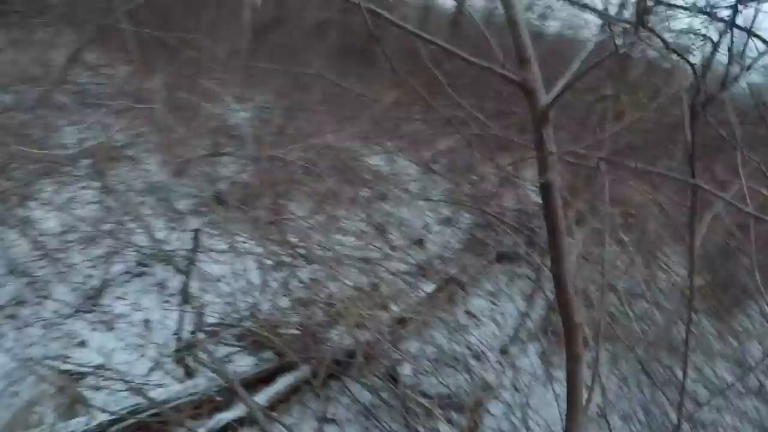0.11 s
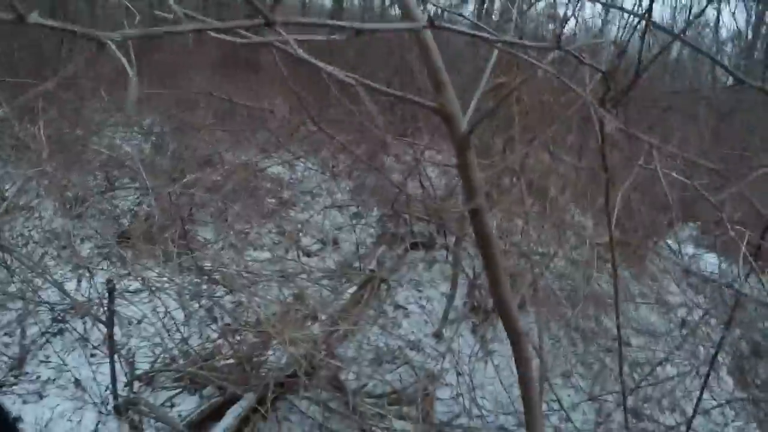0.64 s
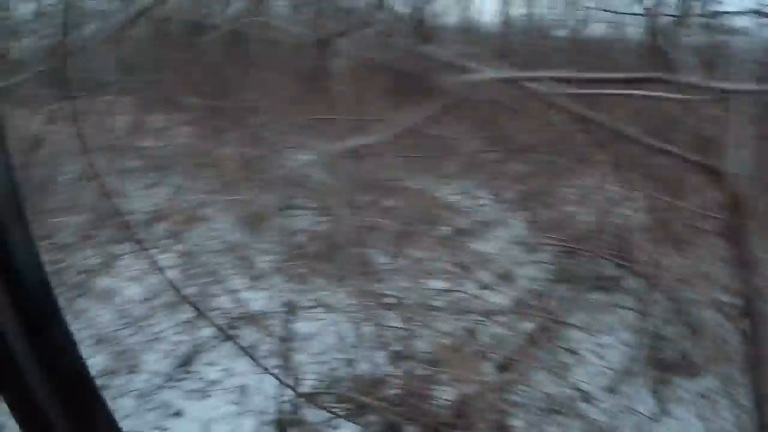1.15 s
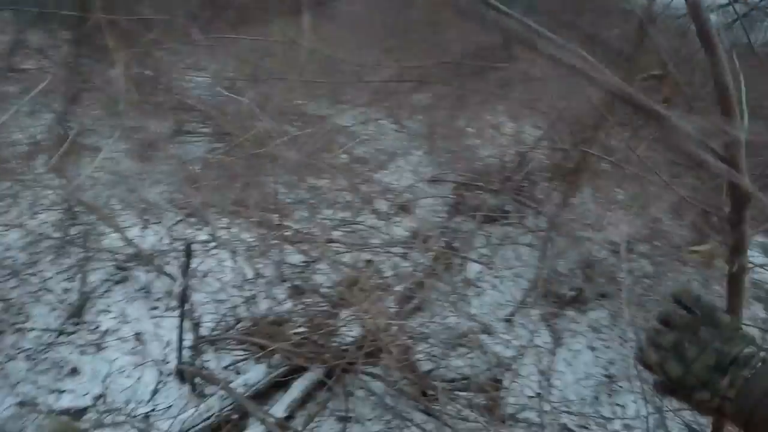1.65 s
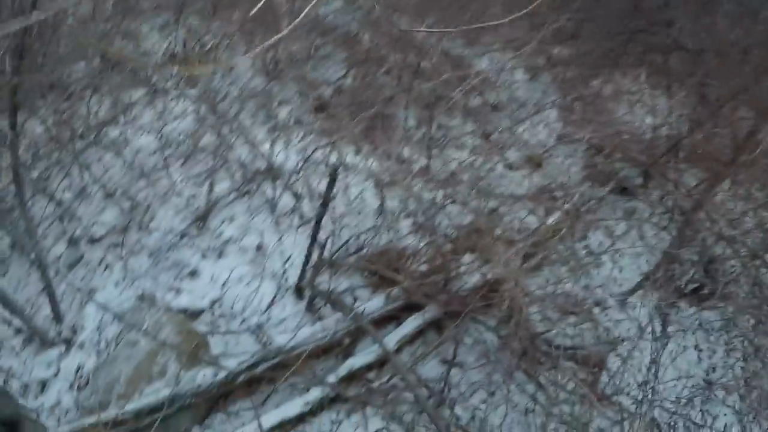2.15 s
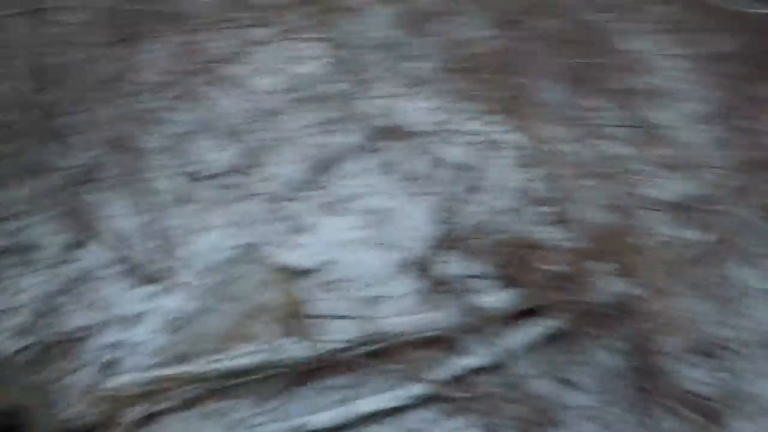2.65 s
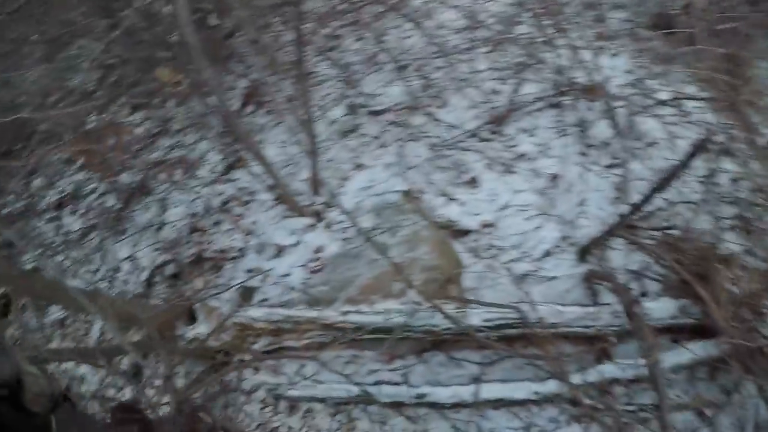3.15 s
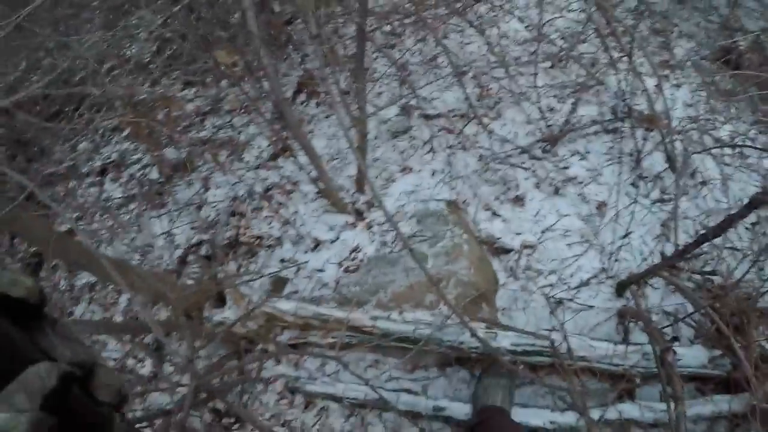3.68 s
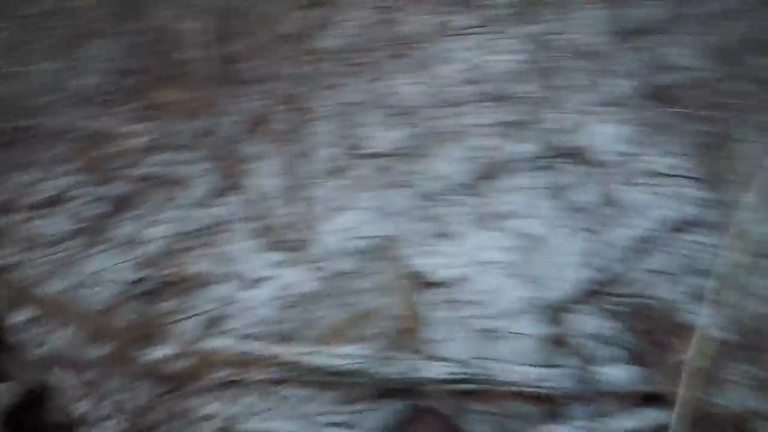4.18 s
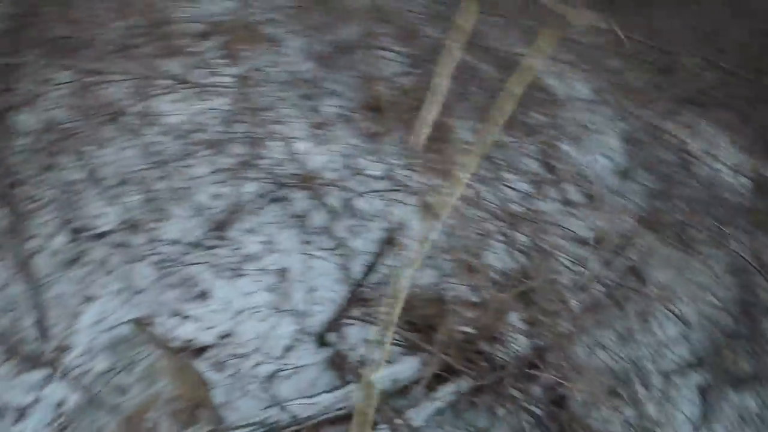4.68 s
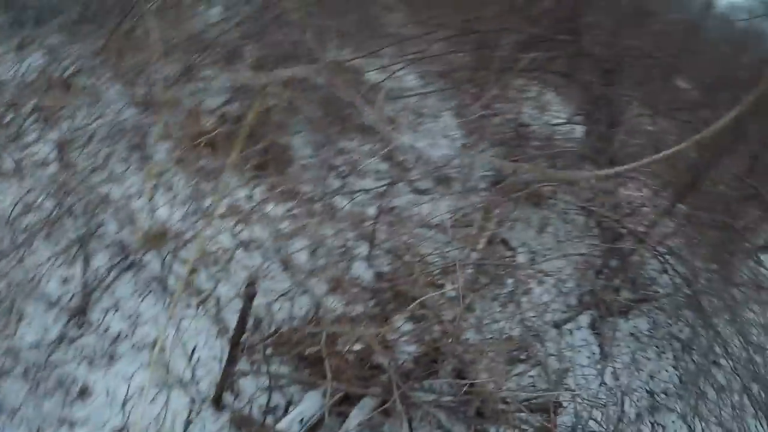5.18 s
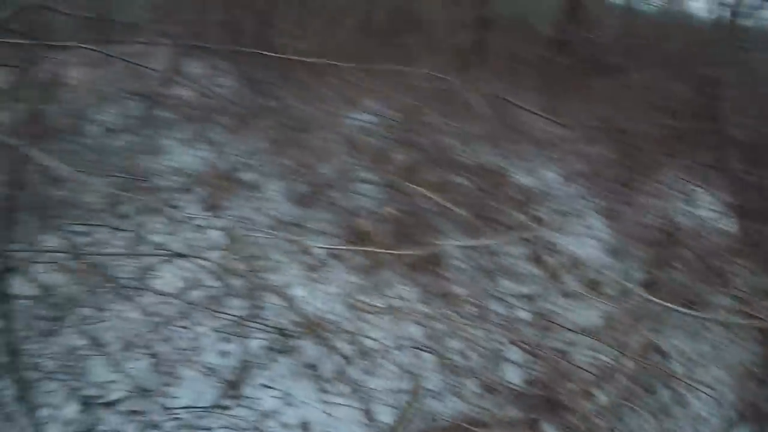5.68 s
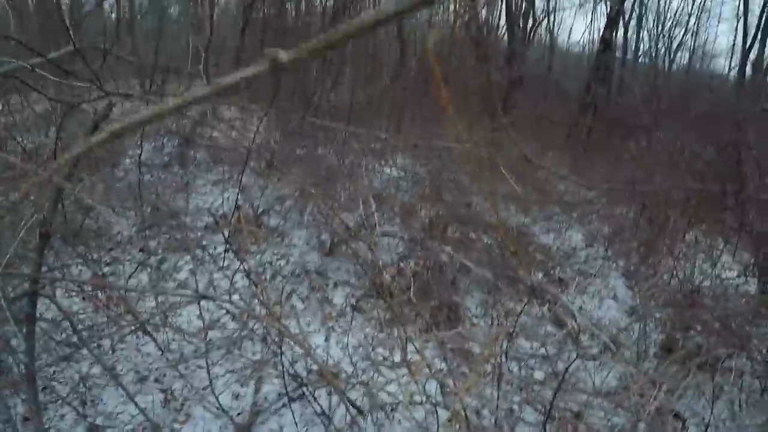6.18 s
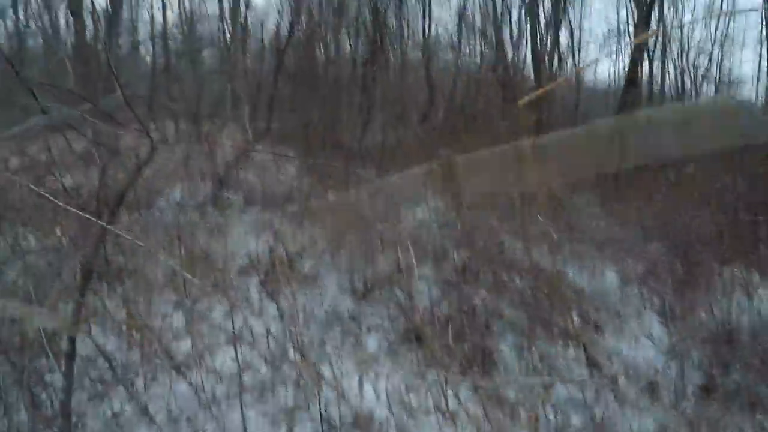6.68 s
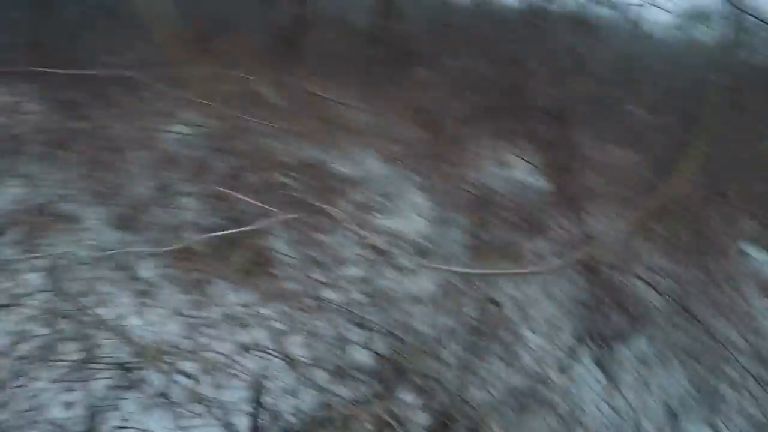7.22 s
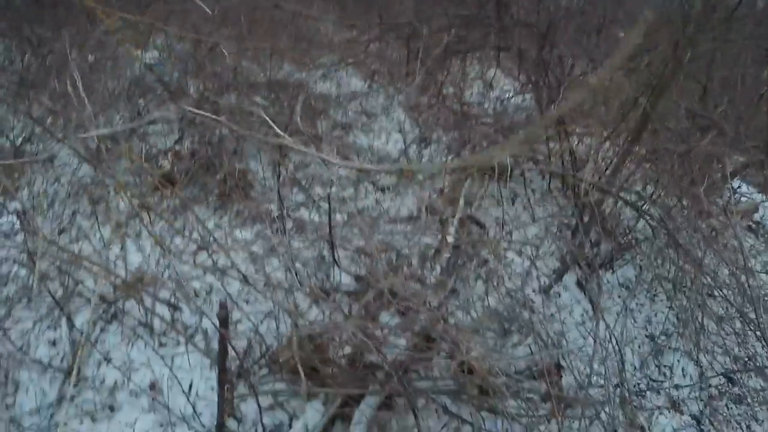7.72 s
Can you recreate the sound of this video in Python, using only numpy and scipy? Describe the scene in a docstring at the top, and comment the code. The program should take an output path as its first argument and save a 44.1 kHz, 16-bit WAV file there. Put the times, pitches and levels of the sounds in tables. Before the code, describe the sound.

Outdoor winter thicket heard from a small microphone on the chest. Sharp cracks and rustling open, a thick flurry of snaps, scrapes and housing knocks follows, then a quieter, centred stretch of cloth rubbing, muffled snowy steps and deep rumble. More scrapes and one hard ringing snap lead into wider, sparser twig breaks over faint hiss.

```python
"""In a dry winter thicket someone pushes through the brush with a small camera on the chest.
Twigs drag over the jacket as grainy stick-slip noise, with loose ticks and crackling notes.
Snaps, scrapes, knocks and short pings are bursts and damped resonances placed one by one.
Body motion shakes the two microphone ports as a low rumble, over a faint treble hiss."""
import sys
import numpy as np
from scipy import signal
from scipy.fft import rfft, irfft, next_fast_len
from scipy.io import wavfile
from scipy.ndimage import uniform_filter1d

SR = 44100
rng = np.random.default_rng(int(sys.argv[2]) if len(sys.argv) > 2 else 0)


def level_to_linear(level):
    """Convert decibel levels to linear amplitude factors, elementwise."""
    exponent = np.asarray(level, float) / 20
    return 10 ** exponent


def waveform_to_disk(signal):
    """Save audio, clipped to [-1, 1], as 16-bit WAV at the path in sys.argv[1]."""
    frames = np.transpose(np.atleast_2d(signal))
    scaled = np.clip(frames, -1, 1) * 32767
    samples = np.round(scaled).astype(np.int16)
    wavfile.write(sys.argv[1], SR, samples)


N = 345458  # length in samples
LEAD_S = 0.004  # room for noise ahead of each blow


def evened(x):
    """Normalisation to unit rms."""
    return x / np.sqrt(np.mean(x ** 2) + 1e-20)


def smoothed(x, span):
    """Low-pass smoothing by two moving averages of span samples."""
    return uniform_filter1d(uniform_filter1d(x, size=span), size=span)


def read(points, hz):
    """Interpolation of a spectrum on a log-frequency axis."""
    f, value = np.transpose(points)
    return np.interp(np.log(hz + 1), np.log(f + 1), value)


def control(table, column):
    """Linear interpolation of one column of a curve at every sample."""
    rows = np.array(table)
    return np.interp(np.arange(N) / SR, rows[:, 0], rows[:, column])


def mode(hz, ring_hz, width):
    """Damped resonance: its causal frequency response, with gain 1 at the centre."""
    return 1 / (1 + 1j * (hz ** 2 - ring_hz ** 2) / (hz * width + 1e-9))


def peaked(pair, db):
    """Peak normalisation: sets the peak of the mid signal."""
    return pair * level_to_linear(db) / abs(pair[0]).max()


# Likeness of the two ports over frequency: freq_hz, likeness (-1 to 1)
PORT_LIKENESS = [(60, 0.92), (130, 0.24), (290, 0.46), (640, -0.0015), (1410, -0.37), (3100, 0.47),
                 (6820, -0.19), (15000, 0.1)]


def ports(a, b, gain, size):
    """Interchannel coherence: two unrelated signals are coloured into the mid and side of the ports."""
    hz = np.fft.rfftfreq(size, 1 / SR)
    same = np.clip(read(PORT_LIKENESS, hz), -0.95, 0.95)
    side_share = np.sqrt((1 - same) / (1 + same))
    return irfft(np.array([rfft(a, size), rfft(b, size) * side_share]) * gain(hz), size)


def friction(spectrum, slips_per_s, spread_db, slip_s, bed, lumps_db, lump_s):
    """Stick-slip friction: noise on a steady bed plus abrupt slips that die away, in uneven lumps."""
    sizes = level_to_linear(spread_db * np.minimum(rng.exponential(1, N), 3))
    slips = sizes * (rng.random(N) < slips_per_s / SR)
    jolts = evened(signal.lfilter([1], [1, -np.exp(-1 / (slip_s * SR))], slips))
    lumps = evened(smoothed(rng.standard_normal(N), max(round(lump_s * SR), 2)))
    a, b = rng.standard_normal((2, N)) * (bed + jolts) * level_to_linear(lumps_db * lumps)
    pair = ports(a, b, lambda hz: level_to_linear(read(spectrum, hz)), next_fast_len(N))[:, :N]
    return pair / pair[0].std()


# Pushes into the brush: start_s (moment of the peak), rustle_db, cloth_db,
# fade_s (time to fall 10 dB; anything shorter acts as 0.03 s)
PUSHES = [(0.0, -33, -39.5, 0.0248), (0.13, -52, -42, 0.13), (0.597, -32.5, -39.5, 0.0272),
          (1.22, -49, -49, -0.7), (1.401, -36, -42, -0.0548), (1.517, -27.5, -42.5, 0),
          (1.834, -43.5, -63, -0.43), (2.61, -44.5, -39.5, -0.08), (2.979, -77, -52, 0.12),
          (3.229, -47, -55, -1.67), (3.622, -35.5, -33.5, 0.06), (3.789, -32.5, -45, -0.15),
          (4.44, -38, -35, -0.17), (4.97, -41, -41.5, 0.17), (5.449, -32, -40, -0.03),
          (5.76, -43.5, -44.5, 0.33), (6.17, -52, -49, 0.2), (6.71, -40.5, -48, 0.1151),
          (7.37, -41.5, -44, -0.04), (7.568, -40.5, -39.5, 0.19)]
# Leaning on the twigs between pushes: time_s, rustle_db, cloth_db
REST = [(0, -39.5, -48), (1.3, -50.5, -49.5), (2.05, -57, -52), (2.45, -53.5, -52.5), (3.3, -51, -49),
        (4.0, -45.5, -45), (5.3, -47, -47.5), (6.4, -48, -52.5), (7.83, -53, -47.5)]
FADE_DB, RISE_SHARE = -10, 0.9  # level change per fade time; rise time as a share of it


def pushed(column):
    """Power summation: the resting level plus every push, which rises a little faster than it fades."""
    t = np.arange(0, N + 256, 256) / SR
    rest_db = control(REST, column)
    power = level_to_linear(rest_db)[np.minimum(np.arange(len(t)) * 256, N - 1)] ** 2
    for push in PUSHES:
        late = (t - push[0]) / max(push[3], 0.03)
        power = power + level_to_linear(push[column] + FADE_DB * np.maximum(late, -late / RISE_SHARE)) ** 2
    return np.interp(np.arange(N) / SR, t, np.sqrt(power))


# Relative spectral density of the microphone hiss: freq_hz, density_db (per Hz)
HISS_SPECTRUM = [(1000, -21), (4000, -11), (8000, 8), (14500, -1), (15200, -5), (15800, -48)]
HISS_DB = -67  # rms of its mid signal


def hiss():
    """Self-noise: the microphones' own treble noise, clearly uneven in level."""
    noise = friction(HISS_SPECTRUM, slips_per_s=50, spread_db=-1, slip_s=0.01, bed=20,
                     lumps_db=5.5, lump_s=0.05)
    return level_to_linear(HISS_DB) * noise


# Relative rumble density with the stereo image narrow: freq_hz, density_db (per Hz)
RUMBLE_NARROW = [(8.8, -29), (15, 7), (43, -0.5), (108, -9), (146, -12), (200, -36), (260, -34.5),
                 (440, -120)]
# Relative rumble density with the image open: freq_hz, density_db (per Hz)
RUMBLE_OPEN = [(8.8, -28), (15, 1), (43, 13.5), (100, -26), (130, -43), (220, -120)]
# Handling rumble: time_s, level_db
SHAKE = [(0, -57.5), (1.5, -59.5), (1.8, -51), (2.4, -46.5), (3.0, -38.5), (3.9, -35.5), (4.2, -46.5),
         (5.1, -51), (5.5, -57.5), (6.3, -66), (7.83, -64)]


def rumble():
    """Structure-borne vibration: body motion shakes the housing, crossfading two spectra by image width."""
    full = friction(RUMBLE_NARROW, slips_per_s=5.5, spread_db=0.5, slip_s=0.04, bed=2.2,
                    lumps_db=2.2, lump_s=0.017)
    thin = friction(RUMBLE_OPEN, slips_per_s=8, spread_db=4, slip_s=0.037, bed=2.5,
                    lumps_db=3.0, lump_s=0.057)
    wide = np.clip(level_to_linear(control(IMAGE, column=1) - 1.0), 0, 1)
    return (wide * thin + np.sqrt(1 - wide ** 2) * full) * level_to_linear(control(SHAKE, column=1))


# Relative spectral density of the jacket and steps: freq_hz, density_db (per Hz)
CLOTH = [(53, -46), (90, -54), (144, 0.5), (189, 2), (496, -5), (904, -9.5), (1500, -9.5), (1950, -17.5),
         (3300, -120)]


def cloth():
    """Sliding friction: dull rubbing of the jacket and muffled steps in thin snow, as one noise."""
    rub = friction(CLOTH, slips_per_s=31, spread_db=3, slip_s=0.008, bed=1.8, lumps_db=1.8, lump_s=0.025)
    return rub * pushed(column=2)


# Relative spectral density of dragging twigs: freq_hz, density_db (per Hz)
RUSTLE = [(350, -14), (600, 3), (1350, 4), (1810, 10), (2110, 6.5), (2930, 7), (3610, 6.5), (5690, 8),
          (12800, -10), (15000, -10), (15800, -57)]
# Crowds of thick to fine twigs: centre_hz, gain_db (on top of the rustle density)
CROWDS = [(1200, -1), (2400, 1), (4800, 1), (9600, 0.5)]


def rustle():
    """Stick-slip friction in bands: each size of twig slips on its own, around its own centre frequency."""
    mix = np.zeros((2, N))
    freqs = np.geomspace(300, 17000, 40)
    for centre_hz, db in CROWDS:
        density_db = read(RUSTLE, freqs) - 5.6 * np.log2(freqs / centre_hz) ** 2
        crowd = friction(np.column_stack([freqs, density_db]), slips_per_s=250, spread_db=2, slip_s=0.0033,
                         bed=0.75, lumps_db=1.0, lump_s=0.012)
        mix += crowd * level_to_linear(db + read(RUSTLE, centre_hz)) * np.sqrt(centre_hz)
    return mix / mix[0].std() * pushed(column=1)


# Relative spectral density of twig-tip clicks: freq_hz, density_db (per Hz)
TICK = [(500, -16), (1500, -3), (4000, 0.5), (7000, 0.5), (11000, -9.5), (15000, -18), (16500, -47.5)]
TICKS_DB = -17  # against the rustle


def ticks():
    """Impulsive excitation: twig tips flick off the cloth as sharp clicks that follow the pushes."""
    flicks = friction(TICK, slips_per_s=50, spread_db=1, slip_s=0.0048, bed=0, lumps_db=-5.5, lump_s=0.035)
    return flicks * level_to_linear(TICKS_DB) * pushed(column=1)


CRACKLE_DB, CRACKLES_PER_S = -8, 520  # level against the rustle; mean rate
CRACKLE_CYCLES = 5.8  # the decay factor loses 60 dB in twice this many cycles


def crackle():
    """Damped free vibration: tiny twigs of many sizes ring briefly, some sizes nearer one port."""
    size = level_to_linear(3.96 * np.minimum(rng.exponential(1, N), 4)) * (rng.random(N) < CRACKLES_PER_S / SR)
    twig = rng.integers(0, 24, N)
    t = np.arange(600) / SR
    out = np.zeros((2, N))
    for k, hz in enumerate(np.geomspace(700, 9000, 24)):
        decay_db = -60 * t * hz / (2 * CRACKLE_CYCLES)
        note = np.sin(2 * np.pi * hz * t) * t * hz * level_to_linear(decay_db + read(RUSTLE, hz)) * hz ** 0.5
        lean = np.array([[1], [rng.uniform(-1, 1)]])
        out += signal.oaconvolve(size * (twig == k), note)[:N] * lean
    return out / out[0].std() * level_to_linear(CRACKLE_DB) * pushed(column=1)


# Dull knocks on the housing: start_s, level_db (mid peak before the final gains), pitch_hz,
# t60_s (held between 0.004 and 0.09 s)
KNOCKS = [(0.402, -26.5, 239, 0.034), (1.083, -41, 202, 0.045), (1.61, -19.5, 172, 0.11),
          (1.702, -22, 202, 0.022), (1.74, -26, 205, 0.088), (1.771, -24, 194, 0.035),
          (1.886, -24, 164, 0.041), (1.928, -34, 243, 0.094), (2.053, -24.5, 179, 0.026),
          (2.078, -29, 200, 0.021), (2.293, -24.5, 293, 0.015), (2.585, -14.5, 130, 0.023),
          (2.677, -29.5, 186, 0.028), (2.906, -28, 187, 0.018), (3.649, -21.5, 410, 0.04),
          (3.88, -23.5, 312, 0.032), (4.426, -34, 190, 0.033), (4.862, -23, 950, 0.037),
          (5.287, -29.5, 490, 0.013), (6.194, -35, 490, 0.036)]


def knock(s, db, hz, t60, noise):
    """Impact response: one blow sets off one unsteady dying note, leaning at random toward one port."""
    t = np.maximum(np.arange(noise.shape[1]) / SR - LEAD_S, 0)
    ring = np.sin(2 * np.pi * hz * t) * (t * hz) ** 0.56 * level_to_linear(-60 * t / np.clip(t60, 0.004, 0.09))
    ring = ring * level_to_linear(3.4 * evened(smoothed(noise[1], span=100)))
    return peaked(np.array([ring, 0.57 * noise[0, 0] * ring]), db)


# Extra ringing notes and bounces of the snaps: start_s, level_db (mid peak before the final gains),
# pitch_hz, t60_s (never below 0.004 s)
PINGS = [(0.067, -26, 3420, 0.0047), (0.145, -21, 3070, 0.0041), (1.487, -20, 6470, 0.0066),
         (1.513, -15, 5550, 0.0044), (1.572, -23, 3750, 0.0038), (1.603, -18.5, 5100, 0.0066),
         (1.629, -26, 5500, 0.0061), (1.681, -17, 4140, 0.0085), (1.692, -24.5, 1720, 0.013),
         (1.761, -17.5, 7640, 0.0038), (2.586, -23.5, 598, 0.023), (4.8613, -7, 3210, 0.0065),
         (6.056, -31, 1500, .008), (6.137, -30, 1200, 0.0066), (6.5225, -27, 2220, 0.0053),
         (6.8946, -20, 5450, .006), (7.378, -24, 3820, 0.0062), (7.561, -21.5, 1500, 0.0041),]


def ping(s, db, hz, t60, noise):
    """Damped resonance: an extra ringing note or bounce of a snap, a short ping shaped like a knock."""
    return knock(s, db, hz, t60, noise)


# Branches dragging past: start_s, level_db (mid peak before the final gains), pitch_hz, length_s
SCRAPES = [(0.5013, -20.5, 4840, 0.032), (.528, -28, 5450, 0.011), (0.58, -29.5, 2420, 0.017),
           (0.6, -28, 1800, 0.018), (1.43, -21.5, 5400, 0.049), (1.458, -19, 3760, 0.025),
           (1.481, -21.5, 3980, 0.019), (1.487, -22.5, 6900, 0.032), (1.51, -28.5, 1490, 0.018),
           (1.524, -25, 6700, 0.052), (1.578, -16.5, 2470, 0.039), (1.5988, -22, 2770, 0.025),
           (1.64, -15, 5000, 0.034), (1.66, -22, 1770, 0.017), (1.661, -24.5, 4060, 0.024),
           (1.674, -17.5, 1800, 0.022), (1.728, -29, 4970, .016), (1.764, -17, 1950, 0.022),
           (1.766, -18, 8550, 0.016), (1.802, -36, 4030, 0.0057), (1.881, -20, 4350, 0.022),
           (2.572, -25.5, 605, 0.026), (2.645, -27, 1190, 0.022), (2.912, -34, 400, 0.069),
           (3.4805, -26, 4330, 0.037), (3.551, -25.5, 3800, 0.029), (3.636, -13.5, 965, 0.045),
           (3.634, -17, 4400, 0.076), (3.718, -27, 2880, 0.023), (3.782, -27, 1300, 0.016),
           (3.915, -19.5, 4740, 0.023), (4.176, -26, 1310, 0.03), (4.3, -29, 4300, 0.042),
           (4.389, -31, 5760, 0.0073), (4.4, -26.5, 690, .02), (4.428, -23, 4170, 0.032),
           (5.3967, -23, 1180, 0.026), (5.4586, -27, 3720, 0.052), (5.647, -32, 1550, 0.061),
           (6.085, -28.5, 5600, 0.027), (6.5507, -31.5, 1490, 0.04), (6.717, -30.5, 1860, 0.019),
           (6.762, -32, 5200, 0.048), (6.896, -24, 5900, 0.0081), (6.911, -29, 5900, .018),
           (7.541, -24, 4950, 0.028)]
HISS_SHARE = 0.2  # broadband part of a scrape that rings at 9 kHz


def scrape(s, db, ring_hz, length, noise):
    """Friction-driven resonance: a ragged drag that stops short, coloured by the rubbing branch."""
    t = np.arange(noise.shape[1]) / SR - LEAD_S
    stroke = np.sin(np.pi * np.clip(t / length, 0, 1) ** 0.45) ** 0.5
    ragged = level_to_linear(6.3 * evened(smoothed(noise[2], span=40)))
    a, b = noise[:2] * stroke * ragged
    share = HISS_SHARE * np.sqrt(ring_hz / 9000)  # thick branches hiss less

    def colour(hz):
        ring = 0.52 * mode(hz, ring_hz, 0.54 * ring_hz) ** 2 + mode(hz, ring_hz, 0.024 * ring_hz)
        return share * level_to_linear(read(CRACK, hz * (3000 / ring_hz) ** 0.5)) + (1 - share) * ring

    return peaked(ports(a, b, colour, len(t)), db)


# Snaps and flicks: start_s, crack_db (mid peak before the final gains), twig_hz, wood_hz,
# wood_db (mid peak before the final gains)
SNAPS = [(0.0668, -13, 6000, 407, -18.5), (0.1303, -19, 5760, 1300, -32), (0.144, -14.5, 1620, 1330, -43),
         (0.2052, -26, 2290, 1250, -35), (0.4017, -7.5, 3590, 636, -24.5), (0.5694, -16, 2450, 519, -47),
         (0.627, -25, 8100, 640, -46), (0.926, -26, 5700, 1120, -52), (1.0874, -41, 1530, 1010, -33.5),
         (1.288, -21.5, 2880, 746, -40), (1.3195, -21, 4300, 1070, -30.5), (1.3763, -17.5, 2950, 1070, -49),
         (1.4065, -17, 5450, 999, -46), (1.4837, -14.5, 4240, 378, -27), (1.5116, -10, 1710, 1300, -43),
         (1.5808, -14.5, 5100, 1290, -28), (1.6175, -14, 3130, 308, -26), (1.6232, -12, 5300, 544, -46),
         (1.7068, -25, 1790, 331, -34.5), (1.7449, -16.5, 1740, 1300, -14.5),
         (1.7544, -13.5, 5040, 830, -27), (1.8597, -14, 5340, 1140, -37), (1.8962, -7, 2350, 360, -42),
         (2.2932, -30, 6270, 656, -27.5), (2.543, -19, 3700, 490, -34), (2.586, -44, 960, 540, -16.5),
         (2.6214, -33, 4150, 1140, -38), (2.876, -24, 6500, 480, -30.5), (2.913, -25.5, 1370, 510, -27),
         (2.9478, -23, 5900, 593, -30), (3.3242, -22.5, 1390, 1300, -51), (3.718, -12.5, 6400, 331, -49),
         (3.81, -11, 4900, 1240, -22), (3.903, -14, 4770, 610, -20.5), (4.3189, -22, 2330, 700, -27.5),
         (4.5156, -19.5, 1800, 550, -23.5), (4.7016, -20.5, 4170, 770, -23), (4.8415, -39, 1420, 840, -26),
         (4.8611, -10.5, 3470, 1010, -16.5), (4.989, -32, 1670, 800, -20.5), (5.0303, -20, 3900, 528, -33),
         (5.0677, -13.5, 5250, 527, -18), (5.2024, -30, 3900, 339, -41), (5.3692, -23.5, 6240, 842, -31.5),
         (5.4026, -17, 1630, 1220, -39), (5.4274, -18.5, 1710, 644, -24.5), (5.5414, -18.5, 2430, 821, -47),
         (5.6301, -15.5, 3230, 1310, -46), (5.6454, -18, 1750, 520, -23.5),
         (5.6652, -22.5, 1670, 1150, -24), (5.7045, -24, 5430, 498, -49), (5.7684, -19.5, 4360, 650, -25),
         (5.838, -29, 1590, 1280, -19.5), (5.98, -19, 1470, 1080, -20.5), (5.9915, -15, 1470, 1080, -23),
         (6.0064, -20.5, 1680, 700, -31), (6.0505, -21.5, 1600, 1190, -19.5),
         (6.131, -19.5, 1490, 1050, -26), (6.2208, -24.5, 1550, 397, -29), (6.4365, -18.5, 5400, 415, -33),
         (6.4514, -23.5, 1470, 437, -31.5), (6.5217, -10.5, 1600, 785, -20.5),
         (6.699, -23.5, 2800, 729, -26), (6.8139, -18.5, 3870, 556, -15.5), (7.3277, -21, 1860, 607, -34),
         (7.378, -37, 3760, 1080, -20.5), (7.432, -32, 1770, 560, -24), (7.4561, -19.5, 3400, 1140, -30),
         (7.5493, -34, 5170, 410, -23.5), (7.6138, -23, 1350, 423, -24.5), (7.7681, -21, 1410, 1270, -28)]
# Relative spectral density of a crack, moved in frequency by thickness: freq_hz, density_db (per Hz)
CRACK = [(130, -27), (400, -1.5), (1000, 0.5), (3000, 4.5), (7000, 5), (11000, -4.5), (15000, -26.5),
         (16500, -55)]
# Where the breaking twigs are as the body turns: time_s, lean_db (nominal, positive to the left)
TWIG_SIDE = [(0, -0.5), (1.4, -3), (2.5, -3.5), (5.3, 4), (5.6, -12), (6.2, -16), (6.8, 0), (7.83, -2)]
SNAP_SCATTER_DB = 8  # random spread of that nominal lean
CRACK_S = 0.00052  # time from the break to the height of the burst
BREAK_DB = 13  # the first clean break, against the tearing fibres


def snap(s, db, twig_hz, wood_hz, wood_db, noise):
    """Brittle fracture: fibres strain, give way and ring twig and stem; splinters follow."""
    from_break = np.arange(noise.shape[1]) / SR - LEAD_S
    t = np.maximum(from_break, 0)
    burst = t / CRACK_S * np.exp(1 - t / CRACK_S)
    strain = 0.12 * np.exp(np.minimum(from_break, 0) / 0.0021) * (t == 0)
    ragged = level_to_linear(5.3 * evened(smoothed(noise[3], span=30)))
    splinters = 0.2 * ragged * np.minimum(t / 0.00079, 1) * level_to_linear(-60 * t / 0.078)
    stem_tail = 0.38 * np.minimum(t / 0.0018, 1) * level_to_linear(-60 * t / 0.054)
    a, b = noise[:2] * (burst + strain + splinters)
    c, d = noise[2:] * (burst + stem_tail)
    clean = level_to_linear(BREAK_DB) * (np.arange(len(t)) == round((LEAD_S + CRACK_S) * SR))
    a, c = a + clean, c + clean
    duller = max((4000 / twig_hz) ** 0.6, 1)  # thick twigs crack duller and ring more

    def twig_colour(hz):
        overtone = 0.5 * mode(hz, 1.73 * twig_hz, 0.074 * twig_hz)
        ring = mode(hz, twig_hz, 700 + 0.0074 * twig_hz) - overtone
        return 0.3 / duller * level_to_linear(read(CRACK, hz * duller)) + ring

    crack = ports(a, b, twig_colour, len(t))
    wood = ports(c, d, lambda hz: mode(hz, wood_hz, 0.41 * wood_hz) * (hz > 130), len(t))
    mid, side = peaked(crack, db) + peaked(wood, wood_db)
    pan_db = np.interp(s, *np.transpose(TWIG_SIDE)) + SNAP_SCATTER_DB * noise[0, 0]
    return np.array([mid, 0.65 * side + np.tanh(0.14 * pan_db) * mid])


# The stereo image folds to the centre and opens again: time_s, width_db (gain on the side),
# lean_db (nominal, positive to the left)
IMAGE = [(0, -0.5, 0), (.6, -0.5, -3.5), (1.2, 0, -2.5), (2.1, 4, -2.5), (2.4, -5.5, -1), (2.7, -25, -8.5),
         (3.5, -24.5, -2), (3.9, -22.5, 0), (4.1, -11.5, -3), (4.5, -5, 1), (5.2, -4.5, -1.5),
         (5.6, 1.5, -1), (6.9, 0.5, -5), (7.2, -0.5, -2), (7.83, -1.5, -0.5)]


def stereo_image(mid, side):
    """Mid-side matrixing: leans and widens the side signal, then forms left and right."""
    lean = np.tanh(0.069 * control(IMAGE, column=2))
    side = (side + lean * mid) * level_to_linear(control(IMAGE, column=1))
    return np.array([mid + side, mid - side])


def scene():
    """Superposition: continuous layers under snaps, scrapes, knocks and pings, turned into left and right."""
    layers = hiss() + rumble() + cloth() + rustle() + ticks() + crackle()
    mix = np.pad(layers, ((0, 0), (SR, SR)))  # a second of room at each end
    for table, source in ((KNOCKS, knock), (PINGS, ping), (SCRAPES, scrape), (SNAPS, snap)):
        noises = rng.standard_normal((len(table), 4, 4096))
        for (s, *blow), noise in zip(table, noises):
            at = SR + round((s - LEAD_S) * SR)
            mix[:, at:at + noise.shape[1]] += source(s, *blow, noise)
    mid, side = mix[:, SR:SR + N]
    return stereo_image(mid, side)


# Resonances heard while the image is narrow: freq_hz, width_hz, peak_db
FOLDED = [(4000, 560, 4), (5900, 420, 1.5)]


def narrow_colour(x):
    """Resonant equalisation: adds peaks in the treble while the image is narrow."""
    size = next_fast_len(N)
    hz = np.fft.rfftfreq(size, 1 / SR)
    gain = 1 + sum((level_to_linear(db) - 1) * mode(hz, f, width) for f, width, db in FOLDED)
    tinted = irfft(rfft(x, size) * gain, size)[:, :N]
    wide = np.clip(level_to_linear(control(IMAGE, column=1)), 0, 1) ** 5.1
    return wide * x + (1 - wide) * tinted


# Gain on all but the bass, its end values held outside the dip: time_s, gain_db
HUSH = [(1.9, 6.5), (1.925, -17.5), (1.98, -23), (2.04, -11.5), (2.065, 0.5)]
HUSH_HZ = 346  # the bass below this is left alone


def hush(x):
    """Band-split gain: all but the bass is raised at first, dips briefly, then returns near unity."""
    bass = signal.sosfiltfilt(signal.butter(N=6, Wn=HUSH_HZ, fs=SR, output="sos"), x)
    return bass + (x - bass) * level_to_linear(control(HUSH, column=1))


def roll_off(x):
    """The treble ends steeply here."""
    return signal.sosfilt(signal.butter(12, 16390, fs=SR, output="sos"), x)


def record(dry):
    """Saturation and band limiting: colour and hush, then the converter clips at full scale."""
    clipped = np.clip(hush(narrow_colour(dry)), -1, 1)
    low_pass = signal.firwin(129, 16000, fs=SR)[None]
    mix = np.clip(signal.oaconvolve(clipped, low_pass, "same"), -1, 1)
    return roll_off(mix)


dry = scene()
out = record(dry)
waveform_to_disk(out)
```